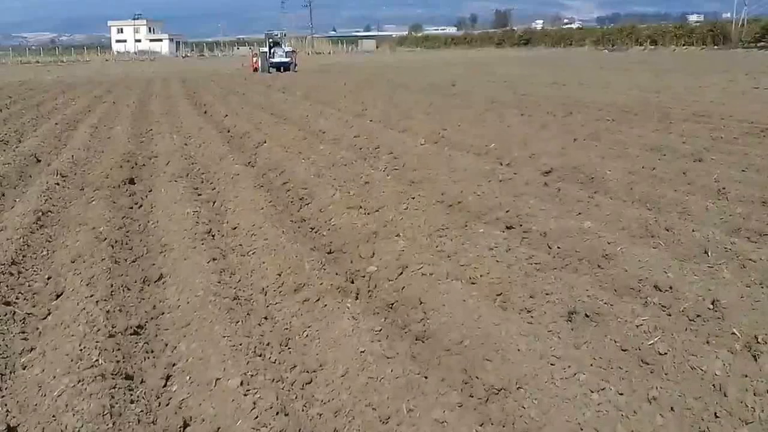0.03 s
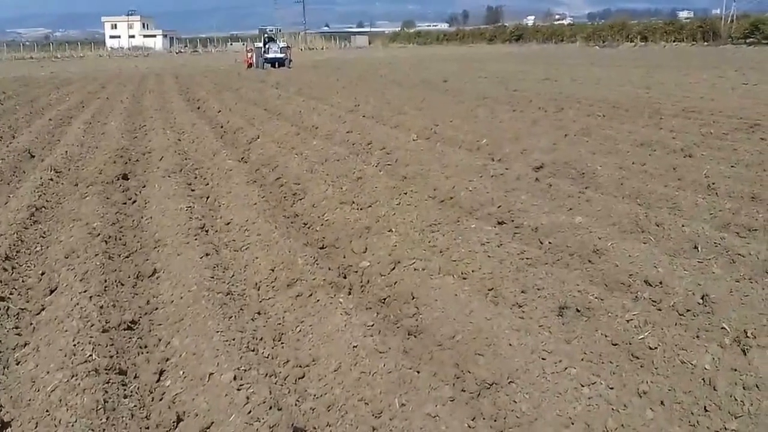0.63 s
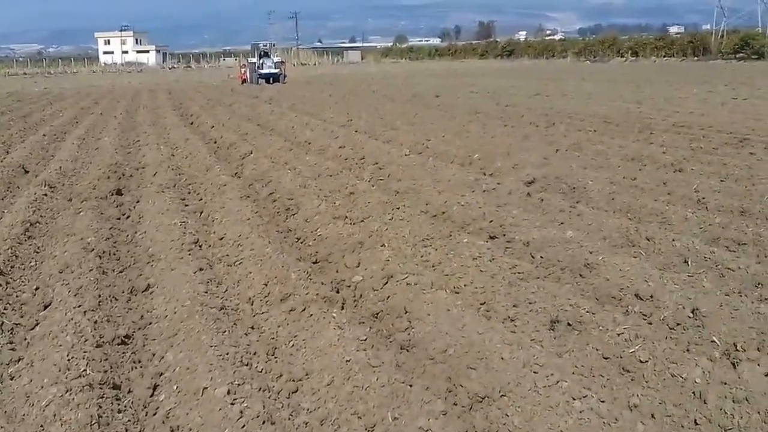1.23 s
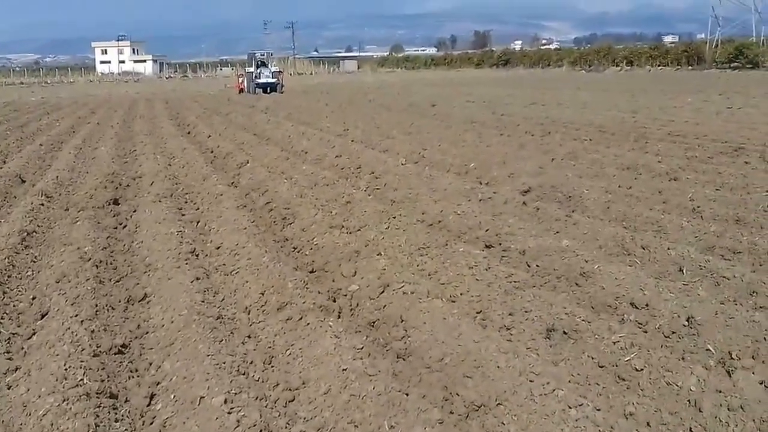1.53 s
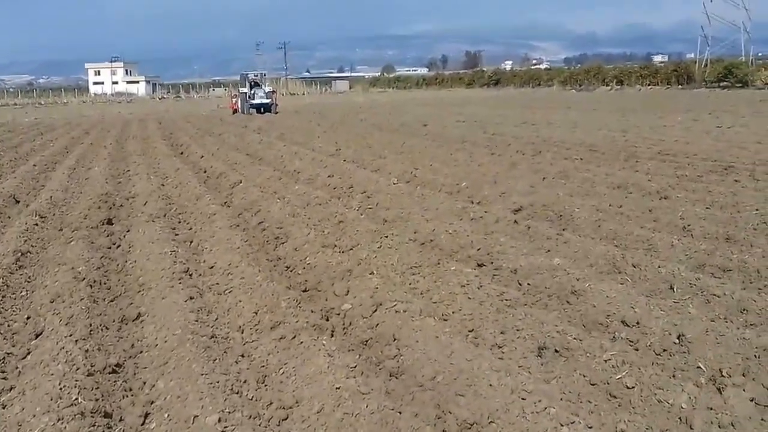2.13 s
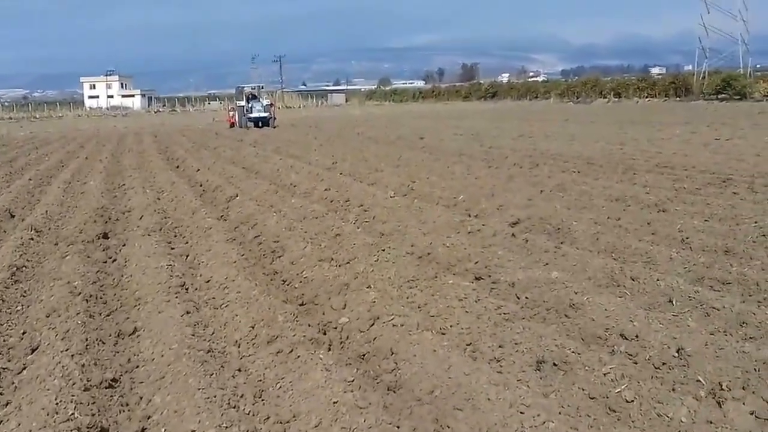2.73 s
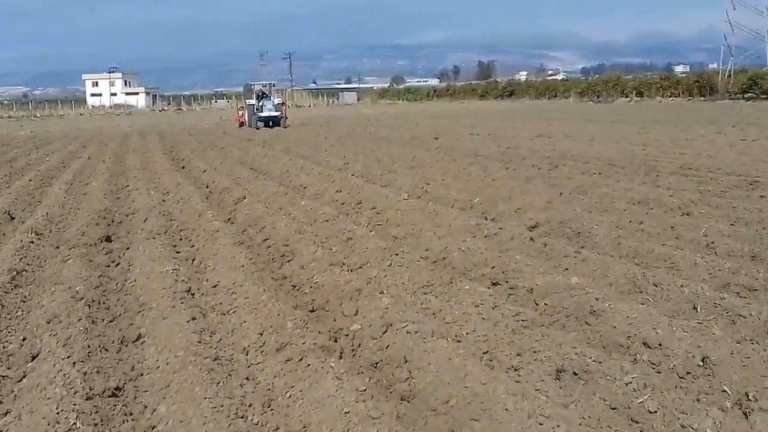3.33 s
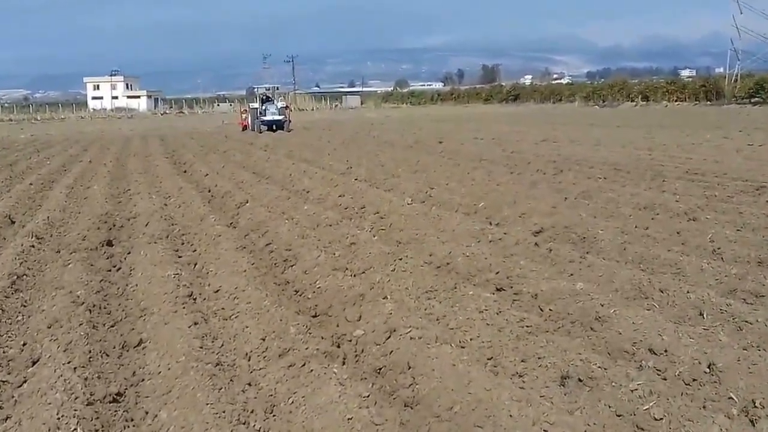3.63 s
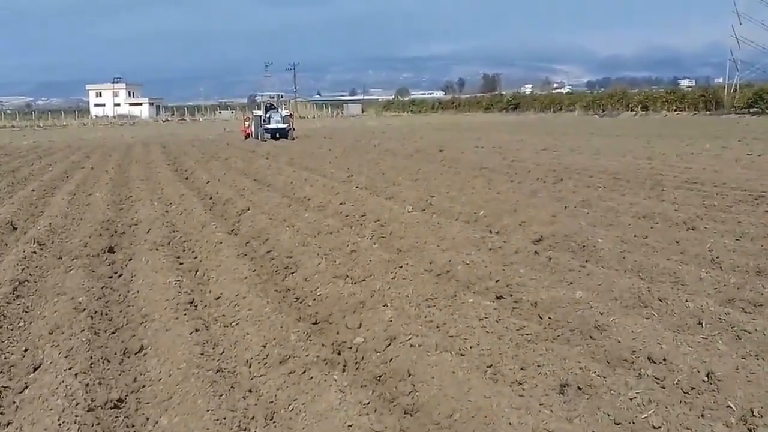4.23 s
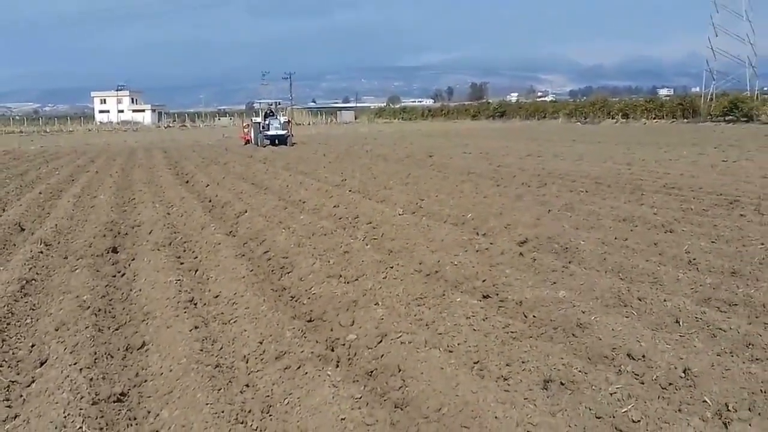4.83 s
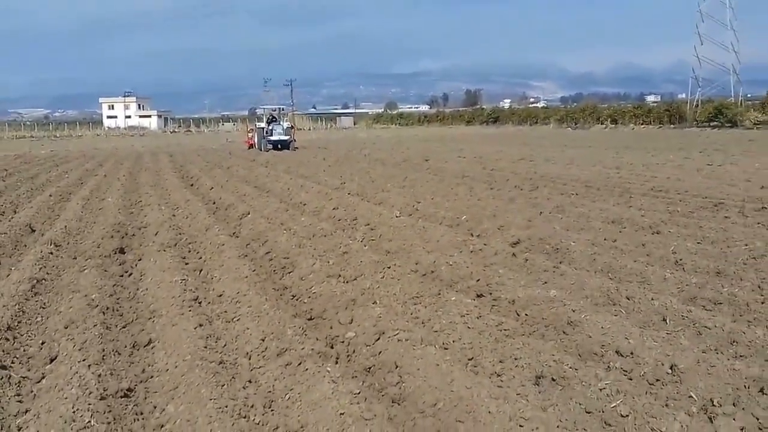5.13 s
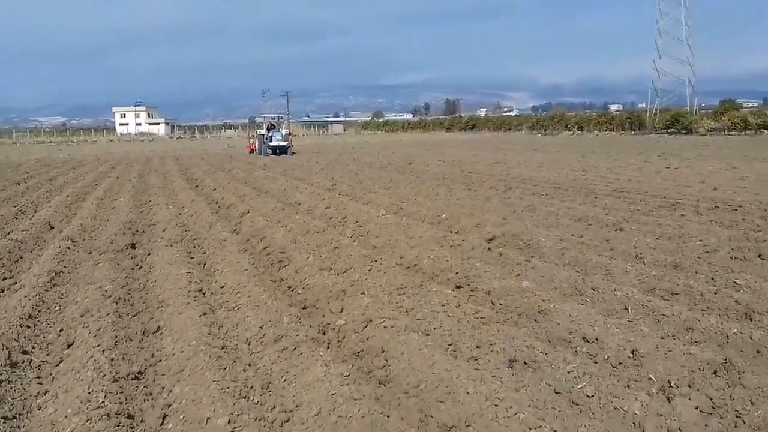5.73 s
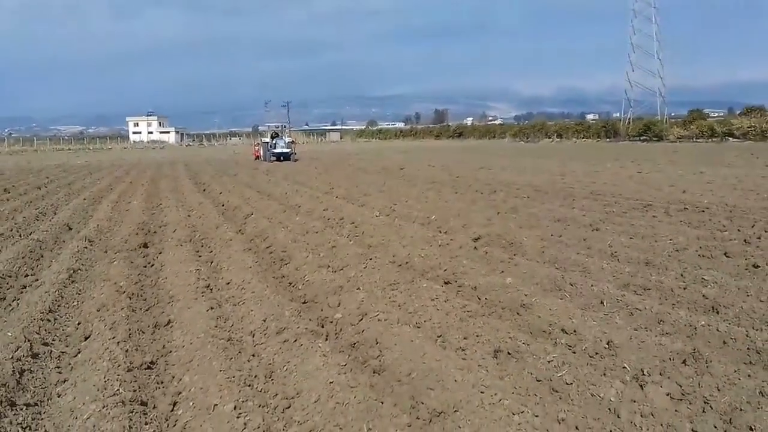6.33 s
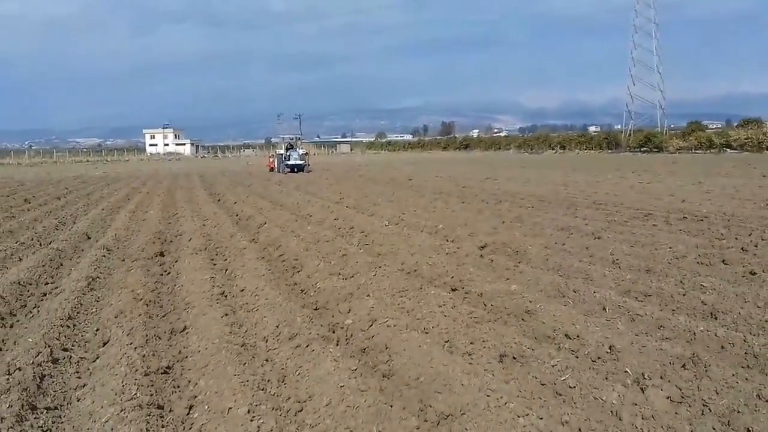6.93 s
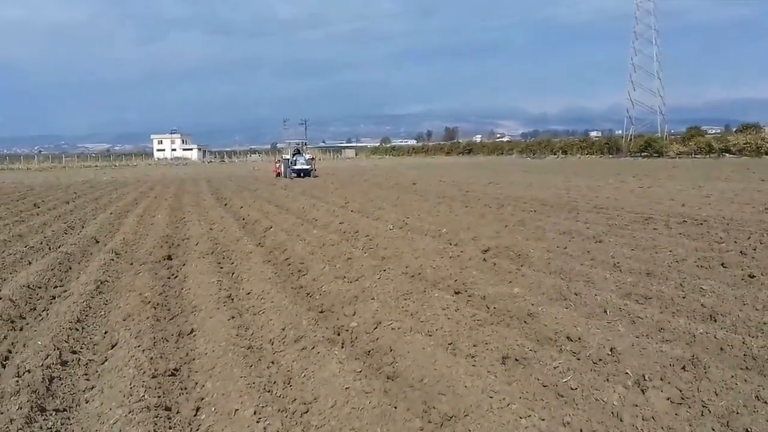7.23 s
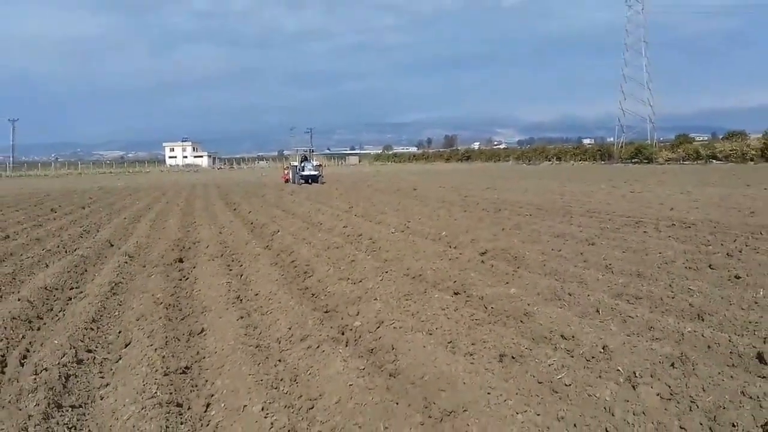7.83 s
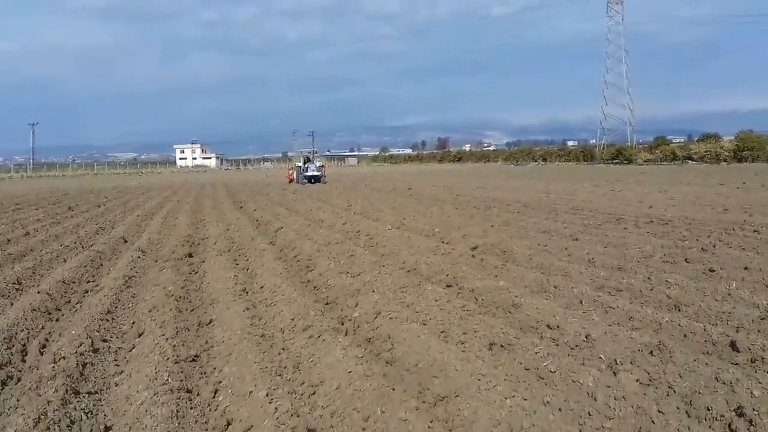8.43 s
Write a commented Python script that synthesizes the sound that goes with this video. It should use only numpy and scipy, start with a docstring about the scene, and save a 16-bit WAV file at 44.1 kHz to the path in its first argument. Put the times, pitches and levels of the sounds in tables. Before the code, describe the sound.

Far off in a wide field, a diesel tractor knocks and hums, its sound swelling and fading on the moving air. The planter it pulls gives a few metal clinks early on, with light tapping and a faint chain jingle throughout. The engine picks up slightly and a gear whine comes in. Wind rumbles on the microphone, buffeting hardest about a third of the way in and again near the end.

```python
"""A gust on the microphone fades in with the clatter of a diesel tractor, far across a wide field.
The engine speeds up a little; its knocks and gear whines drift in and out on the moving air,
over the low hum of the exhaust. The planter it pulls jingles its chain, taps and clinks.
Gusts keep buffeting the microphone, over a faint steady hiss."""
import sys
import numpy as np
from scipy import signal
from scipy.fft import rfft, irfft
from scipy.io import wavfile
from scipy.ndimage import uniform_filter1d

SR = 44100
rng = np.random.default_rng(int(sys.argv[2]) if len(sys.argv) > 2 else 0)


def persist_wave(psi):
    """Save psi, clipped to +-1, as 16-bit WAV."""
    counts = np.round(np.clip(psi, -1, 1) * 32767).astype(np.int16)
    wavfile.write(sys.argv[1], SR, np.atleast_2d(counts).T)


N = 378819
TIME, FREQS = np.arange(N) / SR, np.fft.rfftfreq(N, 1 / SR)

# Engine speed, opened up once, then held by the governor. Each row: time in seconds, firings per second.
ENGINE_SPEED = [(.65, 51.2), (1, 51.85), (1.35, 51.5), (1.65, 51.9), (2.45, 59), (2.9, 61), (3.6, 63),
                (4.75, 62.1), (5.1, 63.05), (6.2, 63), (8.5, 62.8)]
# How the air carries the machine. Each row: time in seconds, level in dB, treble offset in dB.
AIR_CARRY = [(.8, -43, -2), (1.25, -45, -2.5), (1.44, -44, -7), (1.75, -43.5, -2.5), (2.12, -41.5, -1.5),
             (2.35, -40.5, -8), (2.56, -41, -4), (3.58, -43.5, -3.5), (3.85, -36.5, -7), (4.35, -39.3, 0.2),
             (4.6, -41, -4), (4.85, -36, -4), (5.22, -34.5, -4.5), (5.62, -39, -4), (6.05, -34, -0.2),
             (6.62, -41, -8), (6.93, -37.5, -3), (7.25, -41, -4), (7.62, -41.5, -2), (7.93, -36, -0.9),
             (8.12, -39.5, -1), (8.55, -42, 2.5)]


def amp(db):
    """Decibels to gain."""
    return 10 ** (np.asarray(db) / 20)


def unit(x):
    """Scales to rms 1."""
    return x / np.sqrt(np.mean(x ** 2) + 1e-20)


def curves(rows, t=TIME):
    """One automation curve for each column after a table's time column."""
    times, *columns = np.transpose(rows)
    return [np.interp(t, times, column) for column in columns]


def colour(points, hz):
    """Gain of an EQ curve drawn through (Hz, dB) points on a log-frequency axis."""
    point_hz, db = np.transpose(points)
    return amp(np.interp(np.log(hz + 1), np.log(point_hz), db))


def filtered(x, gain):
    """Applies a gain per frequency."""
    return irfft(rfft(x) * gain, N)


def band_rms(x, low_hz, high_hz):
    """Rms of the part of x within a band."""
    return np.std(filtered(x, (FREQS > low_hz) & (FREQS < high_hz)))


def bell(x, centre, width):
    """A bell curve of height 1."""
    return np.exp(-((x - centre) / width) ** 2)


def wander(rate):
    """Slow random motion of rms 1, up to about rate changes a second."""
    t = np.linspace(0, N / SR, 4096)
    hz = np.fft.rfftfreq(len(t), t[1])
    slow = irfft(rfft(rng.standard_normal(len(t))) * bell(hz, 0, rate) * (hz > 0))
    return unit(np.interp(TIME, t, slow))


def add(mix, start_s, sound):
    """Lays a sound into the mix."""
    part = mix[round(start_s * SR):][:len(sound)]
    part += sound[:len(part)]


def tone(cycles, db, flutter_db, blur_rad):
    """A sine that flutters in level and phase on its way through the air."""
    peak = np.sqrt(2) * amp(db + flutter_db * wander(rate=3.6))
    return peak * np.sin(2 * np.pi * cycles + blur_rad * wander(rate=7))


def ring(hz, decay_s, rise_s):
    """One short metallic ring of peak 1, its attack softened by distance."""
    t = np.arange(SR // 10) / SR
    x = (1 - np.exp(-t / rise_s)) * np.exp(-t / decay_s) * np.sin(2 * np.pi * hz * t)
    return x / abs(x).max()


def eddies(noise, hz):
    """Small swirls of air: a broad band of the noise near hz, at rms 1."""
    return unit(filtered(noise, (FREQS / hz) ** 2 / (1 + (FREQS / hz) ** 6)))


def hiss(top_band_db=-72):
    """One microphone's own steady noise."""
    # The hiss colour. Each row: frequency in Hz, relative level in dB.
    hiss_eq = [(20, -8), (70, 2), (170, 10), (480, 16.5), (1000, -7), (3000, -21), (4000, -21.5),
               (4700, 6.5), (6500, 5.5), (9000, 3), (14100, 3), (14300, 3), (14500, 3)]
    noise = filtered(rng.standard_normal(N), colour(hiss_eq, FREQS))
    return amp(top_band_db) * noise / band_rms(noise, 9000, 15000)


def whistle(end_s=1.2, hz=14360, db=-85):
    """A faint, smeared high whistle at the start that stops short."""
    return (TIME < end_s) * tone(hz * TIME, db, flutter_db=2, blur_rad=8)


def wind_strength(breeze_db=-65.5, freshen_db_per_s=0.8, edge_drop_db=7):
    """In dB: each gust swells and dies in one arch above a slowly freshening breeze."""
    # Gusts on the microphone. Each row: peak time in seconds, length in seconds, strength in dB.
    gusts = [(0.55, .2, -44), (2.3, 0.55, -58.5), (2.832, 0.17, -53), (3.071, 0.17, -44.5),
             (3.28, 0.15, -49), (3.75, 0.68, -53), (4.21, 0.12, -52), (5.47, 0.23, -54), (5.808, 0.19, -42),
             (6.42, 0.68, -47.5), (6.956, .26, -38), (7.357, 0.14, -48), (8.302, 0.52, -53)]
    arches = [db - edge_drop_db * (2 * (TIME - peak_s) / length) ** 2 for peak_s, length, db in gusts]
    return np.maximum(np.max(arches, axis=0), breeze_db + freshen_db_per_s * TIME)


def wind(trim_db=-2, lump_db=2.5, ceiling_db=-45, flap_db=-8):
    """Lumpy turbulence at the microphone port; strong gusts add smaller, higher eddies."""
    # The rumble's colour. Each row: frequency in Hz, relative level in dB.
    rumble_eq = [(20, -26), (40, -6), (70, 2.5), (115, 3), (170, -4.5), (250, -8.5), (350, -13), (500, -32),
                 (900, -56)]
    gust_db = np.minimum(wind_strength(), ceiling_db)
    lumps = amp(lump_db * wander(rate=61))
    rumble = filtered(rng.standard_normal(N) * lumps, colour(rumble_eq, FREQS))
    rumble /= band_rms(rumble, 135, 330)
    flaps = eddies(rng.standard_normal(N) * lumps, hz=260) * amp(flap_db + gust_db - ceiling_db)
    return amp(gust_db + trim_db) * (rumble + flaps)


def buffets(trim_db=0.5, width_cycles=0.58, shed_db=-17, shed_s=0.01, port_cut_hz=45):
    """Each strong eddy is a pressure swing of a cycle or two, with smaller eddies shed around it."""
    # Eddies that thump the microphone. Each row: time in seconds, strength in dB, pitch in Hz.
    thumps = [(.715, -34, 190), (1.011, -40, 120), (3.02, -31, 220), (3.039, -18, 125), (3.102, -22, 170),
              (3.245, -32, 140), (3.298, -32, 110), (3.675, -27, 150), (3.834, -35, 132), (4.21, -35, 140),
              (5.424, -34, 95), (5.509, -35, 172), (5.76, -29, 130), (5.82, -30, 140), (5.965, -27, 170),
              (6.309, -33, 110), (6.435, -28, 140), (6.68, -32, 140), (6.88, -21, 145), (6.934, -20, 175),
              (6.982, -25, 140), (7.015, -28, 180), (7.364, -31, 145), (8.196, -35, 135)]
    swings, shedding = np.zeros(N), np.zeros(N)
    for (at_s, db, hz), phase in zip(thumps, rng.random(len(thumps))):
        near = abs(TIME - at_s) < 0.05
        cycles = (TIME[near] - at_s) * hz
        envelope = amp(db + trim_db) / np.cosh(2 * cycles / width_cycles)
        swings[near] += envelope * np.sin(2 * np.pi * (cycles + phase))
        shedding[near] += amp(db + shed_db) * bell(TIME[near], at_s, shed_s)
    pressure = swings + shedding * eddies(rng.standard_normal(N), hz=270)
    return filtered(pressure, FREQS ** 2 / (FREQS ** 2 + port_cut_hz ** 2))


def chain(base_db=-85.5, jingle_db=3, air_follow=0.6, nearing_db_per_s=1.39):
    """Links tumble over their sprockets, louder as the air carries more treble and the planter nears."""
    # The chain's high rings. Each row: centre in Hz, width in Hz, relative level in dB.
    link_rings = [(5875, 48, 4.5), (6550, 230, -2), (7170, 120, -5), (7760, 220, -7)]
    ring_eq = sum(amp(db) * bell(FREQS, hz, width) for hz, width, db in link_rings)
    links = rng.standard_normal(N) * amp(jingle_db * wander(rate=45))
    carry_db, treble_db = curves(AIR_CARRY)
    lift_db = carry_db + treble_db - np.mean(carry_db + treble_db)
    return unit(filtered(links, ring_eq)) * amp(base_db + air_follow * lift_db + nearing_db_per_s * TIME)


def taps(count=200, trim_db=2):
    """Loose parts tap at random as the planter jolts over the soil."""
    # The parts. Each row: pitch in Hz, relative level in dB.
    loose_parts = [(1390, 0), (1530, 0), (1650, -1), (2070, -2), (2640, 0), (3470, -3), (3750, -3),
                   (4380, -7)]
    out = np.zeros(N)
    for when, which, force, detune in rng.random((count, 4)):
        hz, db = loose_parts[int(which * len(loose_parts))]
        tap = ring(hz * (0.993 + 0.014 * detune), decay_s=0.0078, rise_s=0.0014)
        add(out, when * N / SR, amp(db) * force * tap)
    return out * amp(curves(AIR_CARRY)[0] + trim_db)


def clinks(trim_db=-1):
    """Loose metal strikes and rings, a few times and louder than the taps."""
    # The strikes. Each row: start in seconds, peak in dB before the trim, pitch in Hz, decay in seconds.
    strikes = [(.958, -39.5, 4000, 0.018), (1.05, -44, 4950, 0.0088), (2.061, -30.5, 3600, 0.0037),
               (1.972, -35, 3640, .005), (2.114, -31, 3770, 0.0024), (2.132, -27.5, 3660, 0.0034),
               (2.373, -30, 1390, 0.0023)]
    out = np.zeros(N)
    for start_s, db, hz, decay_s in strikes:
        add(out, start_s, amp(db + trim_db) * ring(hz, decay_s, rise_s=0.00064))
    return out


def firing_count(hunting=0.0018):
    """Number of engine firings so far; the governor hunts slightly."""
    rate = curves(ENGINE_SPEED)[0] * (1 + hunting * wander(rate=7.2))
    return np.cumsum(rate) / SR


def exhaust(firings):
    """The firing tone and its octave, each booming near its pipe resonance."""
    # The pipe's tones. Each row: multiple of the firing rate, level in dB, resonance in Hz,
    # its width in Hz, boom in dB, flutter in dB.
    pipe_tones = [(1, -64.5, 58.4, 4.9, 9, 2.5), (2, -69.5, 111.6, 17, 16, 0)]
    rate, out = curves(ENGINE_SPEED)[0], np.zeros(N)
    for multiple, db, hz, width, boom_db, flutter_db in pipe_tones:
        boom = bell(multiple * rate, hz, width)
        out += tone(multiple * firings, db + boom_db * boom, flutter_db, blur_rad=0.1)
    return out


def main_gear(firings, multiple=16, start_s=2.7, fade_s=0.22, peak_s=4.33, peak_db=-49.5):
    """A gear whine locked to the engine speed comes in, swells to a peak and slowly sinks."""
    rise_db_per_s, sink_db_per_s = 4, 2.5
    past_peak_s = TIME - peak_s
    db = peak_db + np.minimum(rise_db_per_s * past_peak_s, -sink_db_per_s * past_peak_s)
    fade = np.clip((TIME - start_s) / fade_s, 0, 1)
    return fade * tone(multiple * firings, db, flutter_db=1.3, blur_rad=0.35)


def lesser_gears(firings, trim_db=-1, fade_s=0.22):
    """Smaller gear whines waver with the engine speed and drift in and out."""
    # The whines. Each row: start and end in seconds, midway pitch in Hz, level in dB before the trim.
    whines = [(.4, 1.7, 1240, -53), (.45, 2.2, 1075, -59), (5.1, 8.9, 1062, -56), (5.7, 8.4, 1531, -54),
              (6.1, 7.9, 405, -69), (7.1, 8.8, 248, -64)]
    out = np.zeros(N)
    for start_s, end_s, hz, db in whines:
        fade = np.clip(np.minimum(TIME - start_s, end_s - TIME) / fade_s, 0, 1)
        multiple = hz / curves(ENGINE_SPEED, (start_s + end_s) / 2)[0]
        out += fade * tone(multiple * firings, db + trim_db, flutter_db=1.6, blur_rad=0.35)
    return out


def knocks(firings, throb_slow=0.17, throb_fast=0.071, uneven_db=0.17, rattles_per_s=110):
    """Noise that swells with each firing and the valve beats between, plus loose rattling metal."""
    rate = curves(ENGINE_SPEED)[0]
    throb = np.interp(rate, [rate.min(), rate.max()], [throb_slow, throb_fast])  # firings blur at speed
    angle = 2 * np.pi * firings
    beat = 1 + throb * (np.cos(angle) + np.cos(2 * angle) / 3 + np.cos(3 * angle) / 2)
    hits = (rng.random(N) < rattles_per_s / SR) * rng.uniform(0, 1.95, N)
    rattle = 0.76 * signal.lfilter([1], [1, -np.exp(-1 / (0.0021 * SR))], hits)  # 2.1 ms decay
    force = beat * np.hypot(amp(uneven_db * wander(rate=60)), rattle)
    return force * rng.standard_normal(N)


def moving_air(sound, low_split_hz=1030, high_split_hz=2750, mid_trim_db=-0.28):
    """The air fades the clatter's body, mids and treble, each on its own curve."""
    # The low body's fader. Each row: time in seconds, level in dB.
    body_levels = [(.7, -58.5), (1.6, -55), (2.05, -50.5), (3.4, -49.5), (4, -44.5), (4.7, -44.5),
                   (6.1, -46.5), (6.6, -48.5), (7.8, -47.5), (8.5, -50.5)]
    carry_db, treble_db = curves(AIR_CARRY)
    lows = 1 / (1 + (FREQS / low_split_hz) ** 10)
    highs = 1 - 1 / (1 + (FREQS / high_split_hz) ** 10)
    body = filtered(sound, lows) / band_rms(sound, 480, 950) * amp(curves(body_levels)[0])
    mids = filtered(sound, 1 - lows - highs) / band_rms(sound, 1100, 2600) * amp(carry_db + mid_trim_db)
    treble = filtered(sound, highs) / band_rms(sound, 2900, 4800) * amp(carry_db + treble_db)
    return body + mids + treble


def clatter(firings, shimmer_db=0.64):
    """The knocks ring the engine and panels; reflected sound cuts notches on the way over the field."""
    # The clatter's colour. Each row: frequency in Hz, relative level in dB.
    engine_eq = [(40, -13.5), (200, -28.5), (430, -18.5), (640, -2.5), (900, -7), (1130, -5), (1350, 1),
                 (1680, -0.5), (2300, -2.5), (3000, -4.5), (3950, -5), (4600, -10.5), (5400, -29),
                 (6300, -43), (9000, -50), (14000, -78)]
    # Panel rings (boosts) and reflection notches (cuts). Each row: centre in Hz, width in Hz, gain in dB.
    ripples = [(1244, 38, 4.5), (1390, 21, 5), (1537, 18, 2.5), (1660, 41, 3), (1886, 65, -13.5),
               (2370, 84, -5.5), (2680, 46, 1), (2898, 99, -4.5), (4265, 59, -10.5), (4420, 75, 0.5),
               (4806, 120, -8.5), (4980, 90, 2)]
    # The path as the tractor nears. Each row: time in seconds, factor on the ripples' frequencies,
    # factor on their depth, gain in dB of the top edge near 5.5 kHz.
    sound_path = [(1.4, .978, 1.2, 6), (2.1, .995, 1.1, -1), (2.6, 1.025, 0.88, 4.5), (3.5, 0.99, 0.87, 4),
                  (4.8, 0.997, .9, 3), (5.9, 0.98, 1.5, -4), (7.3, 1.03, 0.92, -4)]
    hz, frame_s, spectrum = signal.stft(knocks(firings), SR, nperseg=2048, noverlap=1536)
    drift, depth, top_db = curves(sound_path, frame_s)
    path_hz = hz[:, None] / drift
    ripple_db = depth * sum(db * bell(path_hz, centre, width) for centre, width, db in ripples)
    edge_db = top_db * bell(path_hz, 5500, 650)
    speckle = rng.standard_normal(spectrum.shape)  # smoothed in pitch and time into shimmering patches
    patches = unit(uniform_filter1d(uniform_filter1d(speckle, size=24, axis=0), size=7, axis=1))
    spectrum *= colour(engine_eq, hz)[:, None] * amp(ripple_db + edge_db + shimmer_db * patches)
    return signal.istft(spectrum, SR, nperseg=2048, noverlap=1536)[1][:N]


def scene():
    """Tractor, planter and wind sit in the centre; only the hiss differs between the ears."""
    firings = firing_count()
    tractor = moving_air(clatter(firings)) + exhaust(firings) + main_gear(firings) + lesser_gears(firings)
    planter = chain() + clinks() + taps()
    centre = tractor + planter + wind() + buffets() + whistle()
    return np.array([centre + hiss(), centre + hiss()])


def record(dry):
    """The microphone's bass roll-off, a fade-in, then a steep top cut."""
    low_cut_hz, top_cut_hz = 30, 15800
    fade_start_s, fade_s = 0.39, 0.31
    thinned = filtered(dry, FREQS ** 4 / (FREQS ** 4 + low_cut_hz ** 4))
    fade = np.clip((TIME - fade_start_s) / fade_s, 0, 1) ** 1.4
    top_cut = signal.firwin(511, top_cut_hz, window=("kaiser", 9), fs=SR)
    return signal.oaconvolve(thinned * fade, top_cut[None], "same")


dry = scene()
out = record(dry)
persist_wave(out)
```